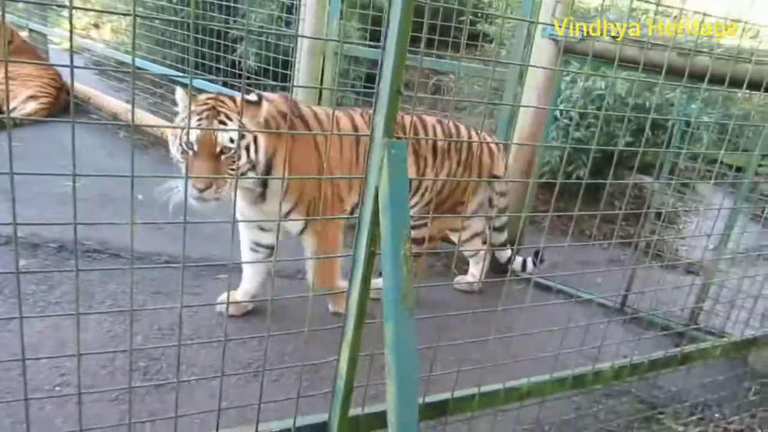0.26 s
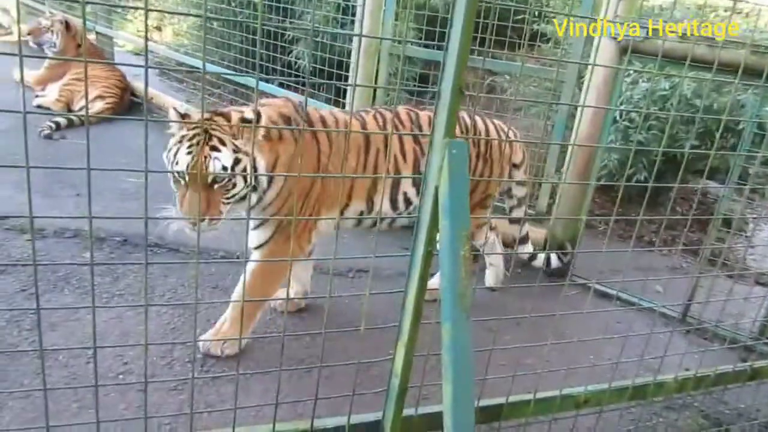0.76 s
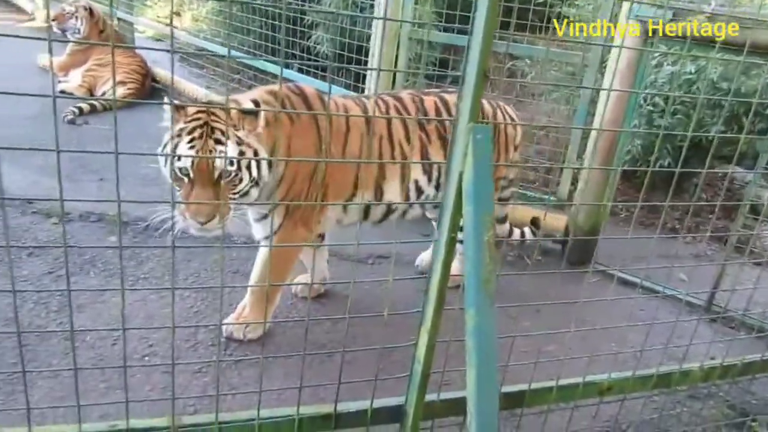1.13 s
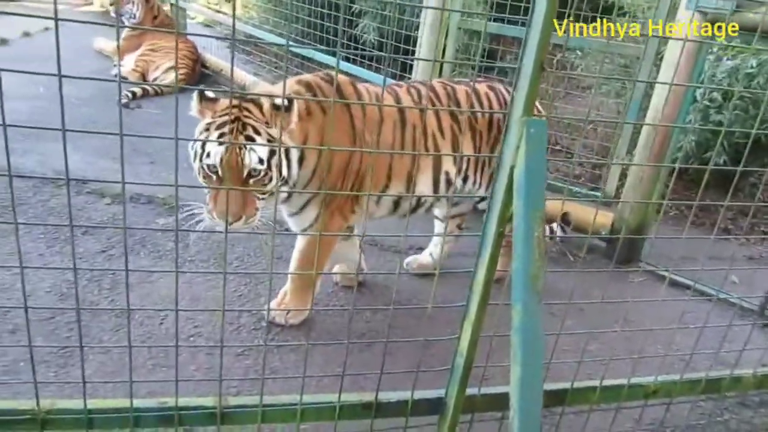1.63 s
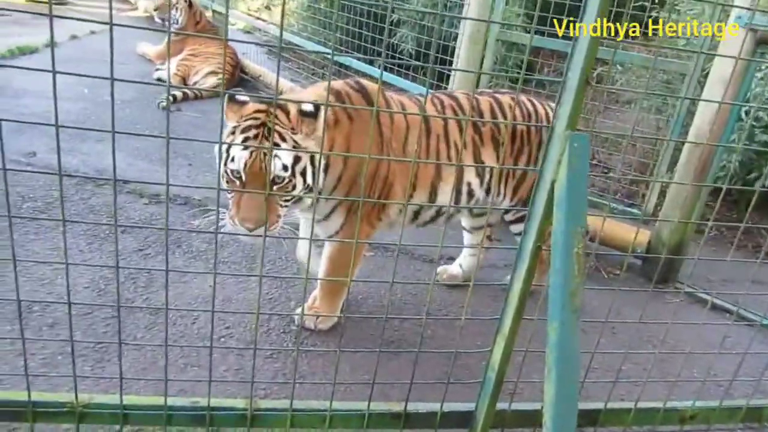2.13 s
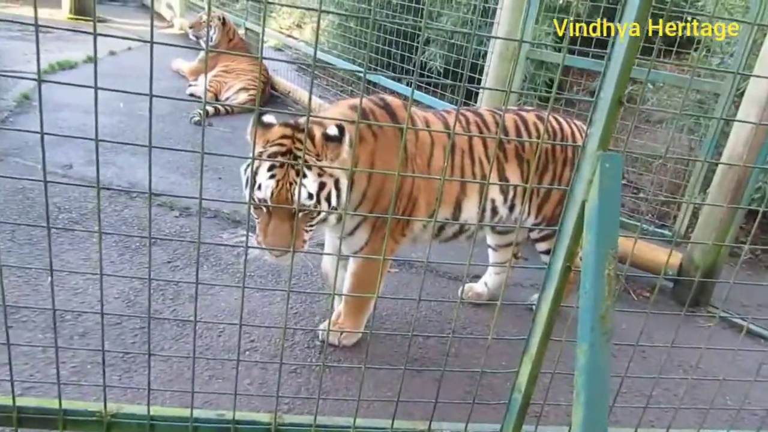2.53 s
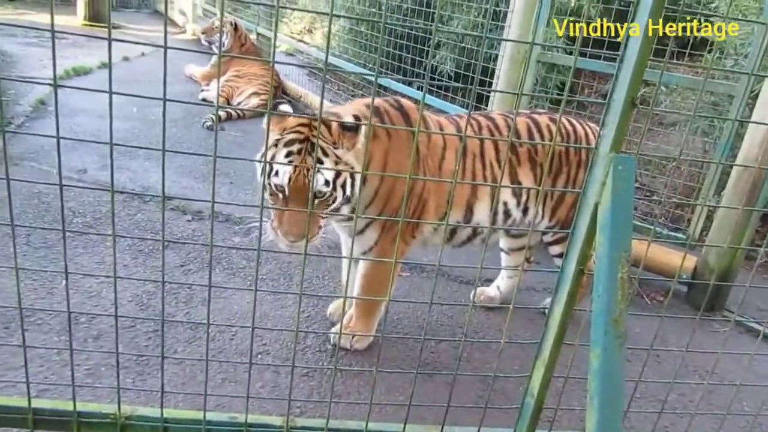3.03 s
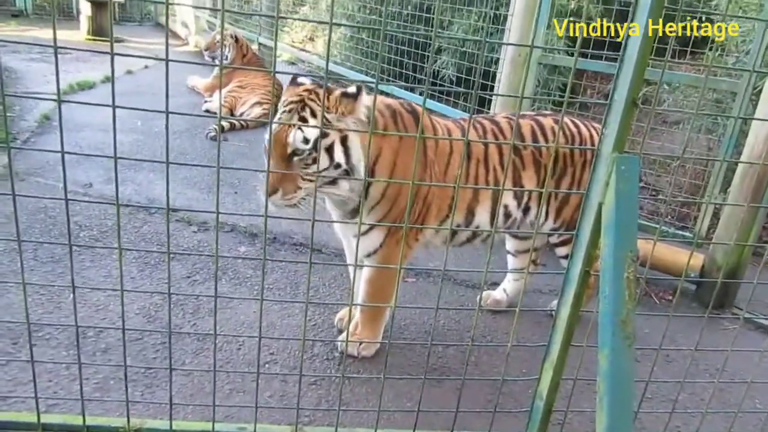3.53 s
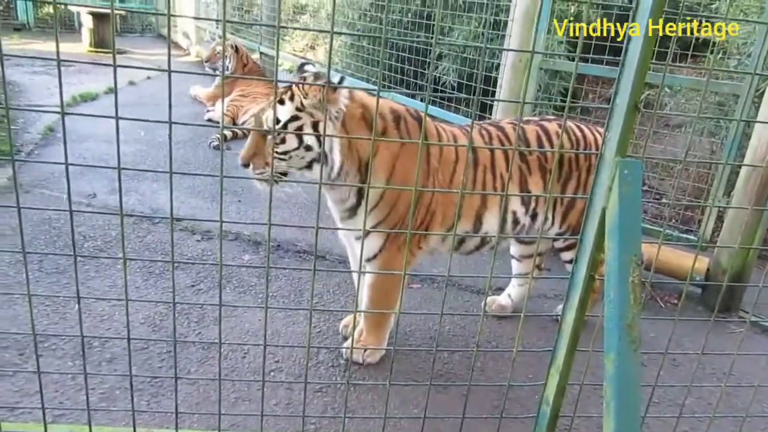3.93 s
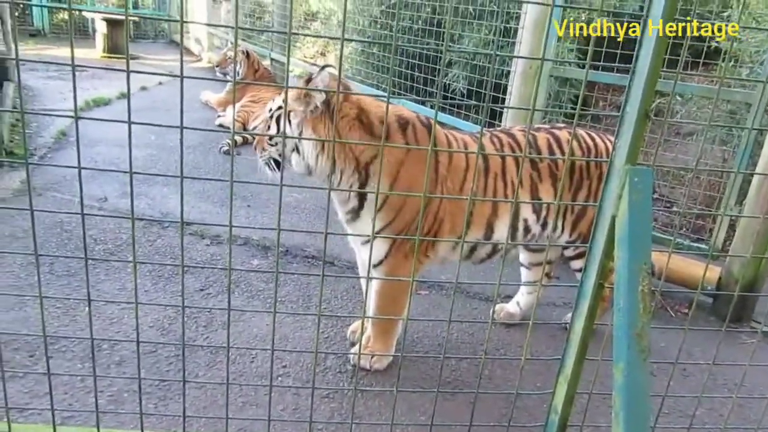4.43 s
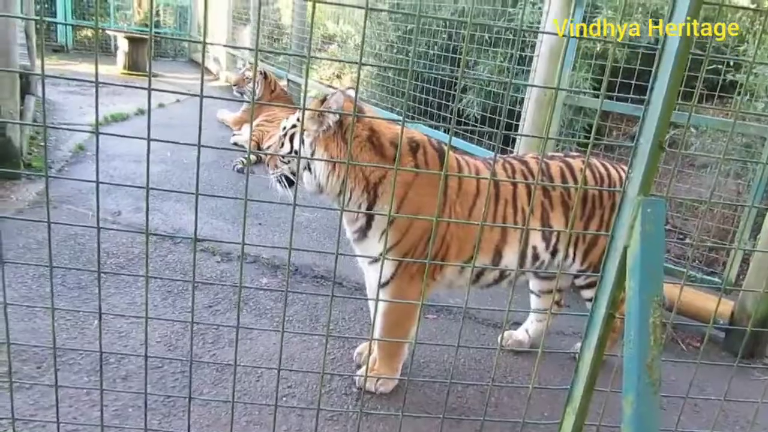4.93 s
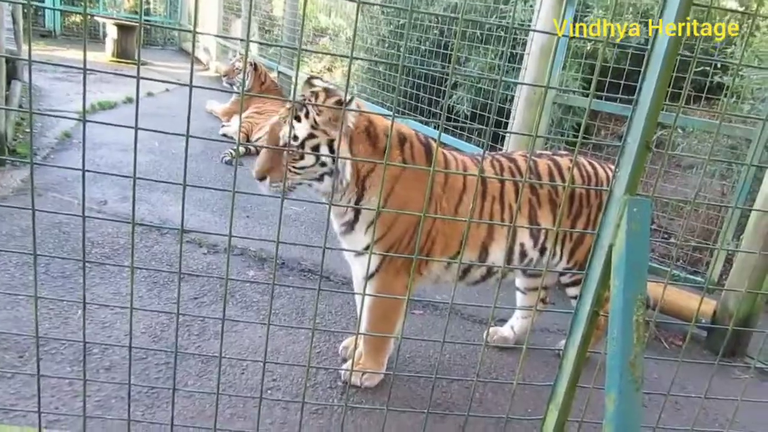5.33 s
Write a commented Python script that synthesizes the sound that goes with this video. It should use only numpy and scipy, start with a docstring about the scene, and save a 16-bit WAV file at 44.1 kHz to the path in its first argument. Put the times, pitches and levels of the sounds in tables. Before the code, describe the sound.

A tiger stands close to the microphone in a paved open-air enclosure. From the start a low closed-mouth rumble, around 150 Hz, leads at 0.12 s into a short harsh roar: a jittery mid-low tone straining upward twice, torn by rasping air and spray, ending near 0.75 s. A small tick follows, and from 0.8 s a longer growl builds, made of slow, irregular flaps about forty a second. It is loudest and brightest around 1.2-1.6 s as the jaw opens, with hard slaps and brief catches, then sinks in pitch and weakens, rattling until 2.4 s. Reverberation is short and faint. Soft outdoor air lifts briefly at 2.5 s, while a high hiss fades after 2.1 s. Thin falling bird whistles come at 2.2-2.7 s, lower chirps at 4.1-4.6 s. Faint distant hums waver from about 3 s, tiny ticks at 3.8 and 4.8 s, soft wind thumps from 4 to 5.4 s.

```python
"""A paved outdoor enclosure: a tiger close by rumbles, bursts into a short harsh roar, then draws out a
rattling growl. The roar is a jittery tone torn by bursts of air; the growl is slow flaps of slack vocal folds
in a moving throat. The enclosure answers briefly. Dry ticks sound, among them clicks of the tiger's mouth and
throat. Below lie air noise that jumps once, a high hiss that fades, gliding bird whistles, faint hums and small
wind thumps. A fast limiter holds the peaks and a low-pass removes the top of the band."""
import sys
import numpy as np
from scipy import signal
from scipy.fft import rfft, irfft, next_fast_len
from scipy.io import wavfile
from scipy.ndimage import uniform_filter1d, minimum_filter1d, map_coordinates

SR = 44100
rng = np.random.default_rng(int(sys.argv[2]) if len(sys.argv) > 2 else 0)


def wav_out(sig):
    """Save sig, one row per channel (or a flat mono array), as 16-bit PCM at SR to the path in sys.argv[1]."""
    wavfile.write(sys.argv[1], SR, np.round(np.clip(np.atleast_2d(sig).T, -1, 1) * 32767).astype(np.int16))


N = 246078

# Outdoor air spectrum. Each row: frequency in Hz, relative density in dB per Hz.
AIR_SPECTRUM = [(20, -14.5), (55, 0), (105, -6.5), (140, -4.5), (170, -9.5), (200, -5.5), (235, -10),
                (280, -10), (345, -13), (550, -13.5), (880, -10), (1700, -18.5), (2400, -24.5),
                (3500, -34.5), (5500, -38), (8000, -40.5), (15000, -51.5)]
# High hiss spectrum. Each row: frequency in Hz, relative density in dB per Hz.
HISS_SPECTRUM = [(2500, -8), (4000, -9.5), (6000, -10), (7600, -8.5), (8600, -9.5), (8800, -43.5),
                 (12000, -90.5)]
AIR_DB, AIR_SWELL_DB, AIR_SWELL_S, AIR_SETTLE_S = -34, 3.5, 2.52, 0.25
HISS_DB, HISS_FADE_S, HISS_FADE_DB_PER_S = -43, 2.1, 13
HISS_DIP_S, HISS_DIP_WIDTH_S, HISS_DIP_DB = .85, 0.1, 1.5

# Decay of the enclosure. Each row: frequency in Hz, T60 in seconds.
ENCLOSURE_T60 = [(150, 0.23), (1000, 0.18), (4000, 0.078), (10000, 0.32)]

# Effort of the growl. Each row: time in seconds, effort in dB.
GROWL_EFFORT = [(.812, -14.5), (.838, -5.5), (1.079, -.3), (1.5, 0), (1.68, -2), (1.86, -6.5), (2.1, -8),
                (2.33, -9), (2.39, -22)]
# Hardest slaps of the folds, before soft limiting. Each row: time in seconds, strength in dB.
FOLD_SLAPS = [(0.837, -22.5), (0.862, -15.5), (0.918, -14), (1.129, -1.5), (1.2, 2.5), (1.295, -12.5),
              (1.322, 4), (1.365, -13), (1.412, -7), (1.441, -11), (1.517, 2.5), (1.55, -2.5), (1.599, -14),
              (1.71, -11), (1.735, -0.5), (1.809, -21), (1.951, -9.5), (1.979, -13), (2.034, -15.5),
              (2.089, -19.5), (2.196, -21), (2.324, -17)]
# Nominal flap rate at 0 dB effort, its slope and its floor; timing scatter in cycles.
FLAP_HZ, FLAP_HZ_PER_DB, SLOWEST_FLAP_HZ, FLAP_SCATTER_CYCLES = 46.58, 3, 36.49, 0.07

# Low body resonances. Each row: centre in Hz, width in Hz, gain in dB.
BELLY_MODES = [(86, 35, -9), (170, 45, 0)]
# Throat resonances. Each row: centre in Hz, width in Hz, gain in dB.
THROAT_MODES = [(236, 37, -8.5), (285, 42, -4), (406, 64, -2)]
# Closed-mouth rumble: four envelope times in seconds; the first and last bound it.
RUMBLE_TIMES_S = (-0.045, 0.2, 0.13, 0.44)
RUMBLE_HZ, RUMBLE_ROUGHNESS = 150.1, 0.5
RUMBLE_DB, RUMBLE_RISE_DB, RUMBLE_FALL_DB, UNDER_ROAR_DB = -15.5, 6, 20.5, -31.5
RUMBLE_THROAT_DB, RUMBLE_NOSE_DB = -12.5, -26.5  # relative to the rumble

# The roar strains twice. Each row: time in seconds, pitch in Hz, roughness (clipped to 0-1).
ROAR_PITCH = [(.11, 360, 1.02), (.18, 459.5, .5), (.245, 350.1, 0.64), (.27, 384.7, 0.94), (.32, 362.4, .5),
              (.375, 334.2, 0.46), (.395, 280.4, 0.25), (.455, 271.9, 0.19), (.495, 345, 0.46),
              (.56, 297.9, .45), (.75, 295, 0.53)]
# Overtones of the roar. Each row: multiple of the pitch, level in dB.
ROAR_OVERTONES = [(2, -26.5), (3, -17), (4, -29.5), (5, -28.5)]
# Torn air in the open mouth. Each row: frequency in Hz, relative density in dB per Hz.
RASP_SPECTRUM = [(440, -40), (750, 4), (1090, -8), (1180, -4), (1410, -8.5), (1550, -8), (2010, -12),
                 (2070, -11.5), (2390, -22.5), (3200, -29.5), (4160, -62.5), (7040, -120)]
# Air over the teeth. Each row: frequency in Hz, relative density in dB per Hz.
SPRAY_SPECTRUM = [(1410, -24), (2400, 2), (2520, -1), (2720, -0.5), (3350, -1), (4210, -4.5), (6120, -15),
                  (8500, -24.5), (11000, -63), (18700, -120)]
# The mouth lets more or less air out. Each row: time in seconds, half-length in seconds, rasp in dB, spray in dB.
AIR_BLASTS = [(0.232, .016, 6, 3), (0.524, 0.034, 4.5, 6.5), (.648, 0.018, -1.5, 5)]
# Roar envelope. In order: start, full level, release and end, all in seconds.
ROAR_TIMES_S = (.12, .185, .59, .755)
ROAR_DB, ROAR_RISE_DB, ROAR_FALL_DB = -3, 15.5, 19.5
# Rasp at 300 Hz and zero roughness; slopes with pitch and roughness; dB per dB of envelope.
RASP_DB, RASP_DB_PER_OCT, RASP_ROUGH_DB, RASP_FOLLOWS = -25, 13.5, 11, 0.67
SPRAY_DB, SPRAY_ROUGH_DB, SPRAY_FOLLOWS = -37, 11.5, 1

# The voice catches; a negative depth lifts it. Each row: time in seconds, depth in dB.
VOICE_CATCHES = [(.57, 7), (.885, -0.5), (.945, 0), (.99, 5.5), (1.186, 4), (1.254, 12.5), (1.374, 12),
                 (1.535, 8.5), (1.608, 3), (1.7, 6), (1.865, 2), (2.235, -1)]
CATCH_WIDTH_S, BRIGHT_CATCH_SHARE = 0.0099, 0.16

# Ticks, which ring where the band is narrow. Each row: time in seconds, peak in dB, low edge in Hz, high edge in Hz.
TICK_BANDS = [(0.775, -21, 1172, 2430), (1.552, -24, 4610, 6900), (2.35, -26, 1285, 1355),
              (3.772, -42, 5440, 8000), (4.783, -43.5, 4000, 14500)]

# Jaw and lips in the growl. Each row: time in seconds, jaw opening 0-1, share of bared teeth 0-1.
JAW_AND_LIPS = [(.82, 0, 0), (1.0, 0.22, 0.15), (1.205, 0.51, 0.09), (1.235, 0.92, 0.77),
                (1.44, 0.88, 0.86), (1.55, 0.6, 0.51), (1.76, 0.64, 0.56), (2.0, 0.38, 0.31),
                (2.38, 0.35, 0.42)]
# Mouth resonances moving with the jaw. Each row: shut centre in Hz, open centre in Hz, width in Hz,
# shut gain in dB, open gain in dB.
MOUTH_MODES = [(727, 927, 60, 22.5, 19), (1025, 1090, 94, 6.5, 24), (1266, 1286, 97, 17.5, 7.5),
               (1370, 1720, 240, -2.5, 17.5)]
# Teeth bared. Each row: centre in Hz, width in Hz, gain in dB.
BARED_TEETH_MODES = [(2100, 130, 10), (2550, 170, 4), (2850, 190, 1.5), (3480, 170, 1.5),
                     (4030, 240, -12.5)]
# Lips lowered. Each row: centre in Hz, width in Hz, gain in dB.
COVERED_TEETH_MODES = [(2130, 93, 9.5), (2790, 190, -1), (3400, 1000, -5), (4080, 760, -27)]
# Narrow gap between lip and teeth. Each row: centre in Hz, width in Hz, gain in dB.
LIP_GAP_MODES = [(3267, 46, 0)]
# Chest at 0 dB effort; dB per dB of effort. It joins weaker and rough, and clears by SAG_START_S.
CHEST_DB, CHEST_FOLLOWS, CHEST_JOIN_LOSS_DB = -14, 1.8, 4
TAUT_ROUGHNESS, SLACK_ROUGHNESS = 0.38, 0.36
# Chest pitch holds, then sinks.
CHEST_TAUT_HZ, CHEST_SLACK_HZ, SAG_START_S, SAG_TIME_CONSTANT_S = 187.7, 109, 1.06, .3
THUMP_HZ, THUMP_WIDTH_HZ, THUMP_SHARE = 120, 42, 0.47  # share of power when slack
THROAT_DB, THROAT_FADE_DB_PER_S = -12, 10  # fades as the lungs empty
MOUTH_DB, TEETH_DB, BARING_DB = -20, -46.5, 23  # at 0 dB effort; extra for fully bared teeth
WHISTLE_S, WHISTLE_WIDTH_S, WHISTLE_DB = 1.91, 0.12, -4.5  # relative to the teeth noise
LEAK, LEAK_PER_DB = 0.73, 0.07  # relative leak between flaps; exponential slope with effort

# Distant birds. Each row: start in seconds, length in seconds, start pitch in Hz, end pitch in Hz, level in dB.
BIRD_CHIRPS = [(2.23, .11, 7300, 6410, -46), (2.405, 0.094, 7450, 7260, -42),
               (2.476, 0.073, 6850, 6300, -52), (2.56, .1, 6340, 5100, -53), (4.06, .1, 3850, 3800, -60),
               (4.12, .17, 4500, 4550, -56.5), (4.18, 0.12, 3400, 3280, -54),
               (4.426, .075, 3860, 3900, -53), (4.47, .11, 2890, 2850, -47), (4.568, .07, 3860, 3800, -55)]
# Far-off hums, full between the times. Each row: start in seconds, end in seconds, pitch in Hz, level in dB.
FAR_HUMS = [(3.57, 3.9, 138, -41), (3.1, 3.95, 280, -45.5), (4.38, 5.35, 180, -42)]
# Wind on the microphone. Each row: time in seconds, envelope peak in dB, pitch in Hz.
WIND_BUFFETS = [(4.021, -27, 92), (4.441, -28, 79), (4.729, -28, 69), (5.22, -27.5, 85), (5.408, -22.5, 68)]

TOP_HZ = 15050


def amp(db):
    """Decibels to gain."""
    return 10 ** (np.asarray(db) / 20)


def unit(x):
    """Scale to rms 1."""
    return x / np.sqrt(np.mean(x ** 2) + 1e-20)


def steady(x, size=3500):
    """Hold the slow level near rms 1 over size samples; keep the fast grain."""
    power = uniform_filter1d(uniform_filter1d(x * x, size), size)
    return x / np.sqrt(np.abs(power) + 1e-6 * np.mean(x * x))


def clock():
    """Time of every sample in seconds."""
    return np.arange(N) / SR


def along(points, hz):
    """Interpolate (Hz, value) points on a log-frequency axis."""
    f, v = np.transpose(points)
    return np.interp(np.log(hz + 1), np.log(f + 1), v)


def curves(rows):
    """One value per sample for each column after the time."""
    s, *cols = np.transpose(rows)
    return [np.interp(clock(), s, c) for c in cols]


def during(start, end, fade=0.015):
    """1 from start to end, with linear fades outside."""
    return np.clip(1 + np.minimum(clock() - start, end - clock()) / fade, 0, 1)


def bump(s, width):
    """Gaussian of height 1 at time s."""
    return np.exp(-((clock() - s) / width) ** 2 / 2)


def swell(times_s, rise_db, fall_db):
    """Envelope in dB relative to full level, interpolated over four times."""
    return np.interp(clock(), times_s, [-rise_db, 0, 0, -fall_db])


def wobble(rate):
    """Smooth random curve, rate knots a second."""
    return map_coordinates(rng.standard_normal(N // 8), [np.arange(N) * rate / SR], mode="mirror")


def filtered(x, response):
    """Apply a complex response of frequency."""
    m = next_fast_len(N + SR // 2)
    return irfft(rfft(x, m) * response(np.fft.rfftfreq(m, 1 / SR)), m)[:N]


def coloured(x, spectrum):
    """Shape x by the spectrum, at rms 1."""
    return unit(filtered(x, lambda hz: amp(along(spectrum, hz))))


def band(x, low_hz, high_hz, order=3):
    """Causal band-pass."""
    edges = [low_hz, min(high_hz, .45 * SR)]
    return signal.sosfilt(signal.butter(order, edges, "band", fs=SR, output="sos"), x)


def resonate(x, modes):
    """Parallel fixed resonances of alternating sign."""
    def response(f):
        return sum((-1) ** k * amp(db) * 1j * f * w / (c * c - f * f + 1j * f * w)
                   for k, (c, w, db) in enumerate(modes))
    return filtered(x, response)


def glide(x, hz, width):
    """One resonance whose centre follows hz, at rms 1: shift to zero, smooth, shift back."""
    turn = np.exp(2j * np.pi * np.cumsum(hz) / SR)
    pole = np.exp(-np.pi * width / SR)
    smooth = signal.lfilter([1 - pole], [1, -pole], x * turn.conj())
    return unit((smooth * turn).real)


def flaps(rate, scatter, size_db):
    """Impulses with random timing (scatter in cycles) and random size."""
    at = np.flatnonzero(np.diff(np.floor(np.cumsum(rate) / SR)))
    late, size = rng.standard_normal((len(at), 2)).T
    at = np.clip(at + scatter * late * SR / rate[at], 0, N - 1).astype(int)
    return np.bincount(at, amp(size_db * size), N)


def puffs(pulses, life_s, leak):
    """Each pulse lets out turbulent air that swells and dies; some leaks between."""
    pole = np.exp(-1 / (life_s * SR))
    flow = signal.lfilter([1], np.poly([pole, pole]), pulses)
    return (unit(flow) + leak) * rng.standard_normal(N)


def outdoors():
    """Open-air noise that jumps and settles once, and high hiss that dips briefly, then sinks away."""
    t = clock()
    settle = np.exp(-np.abs(t - AIR_SWELL_S) / AIR_SETTLE_S)
    swell_db = AIR_SWELL_DB * during(AIR_SWELL_S, t[-1]) * settle
    air = coloured(rng.standard_normal(N), AIR_SPECTRUM) * amp(AIR_DB + swell_db + wobble(5.1))
    fade_db = HISS_FADE_DB_PER_S * np.maximum(t - HISS_FADE_S, 0)
    hiss_db = HISS_DB - fade_db - HISS_DIP_DB * bump(HISS_DIP_S, HISS_DIP_WIDTH_S)
    return air + amp(hiss_db) * coloured(rng.standard_normal(N), HISS_SPECTRUM)


def folds():
    """Slack folds flap faster with effort, with weak rebounds; the flap count is warped to meet the hard slaps."""
    effort_db, = curves(GROWL_EFFORT)
    cycles = np.cumsum(np.maximum(FLAP_HZ + FLAP_HZ_PER_DB * effort_db, SLOWEST_FLAP_HZ)) / SR
    slap_at = [round(s * SR) for s, db in FOLD_SLAPS]
    marks = cycles[[0, *sorted(slap_at), N - 1]]
    whole = np.cumsum(np.maximum(1, np.round(np.diff(marks, prepend=0))))
    rate = SR * np.gradient(np.interp(cycles, marks, whole))
    hard = np.bincount(slap_at, [amp(db) for s, db in FOLD_SLAPS], N) / amp(effort_db - 15.5)
    clear = minimum_filter1d((hard == 0) * 1., size=700)  # no ordinary flap beside a slap
    rebounds = .3 * flaps(rate * 1.4, scatter=.3, size_db=2.5)
    beats = flaps(rate, FLAP_SCATTER_CYCLES, size_db=1.5)
    return clear * (beats + rebounds) + 3.0 * np.tanh(hard / 2.95)


def chest(pulses, pitch, rough):
    """Lowest resonance, near rms 1: a jittery hum, replaced by pulsed throbbing air as roughness rises."""
    rough = np.clip(rough, 0, 1)
    phase = 2 * np.pi * np.cumsum(pitch * np.exp(0.13 * rough * wobble(70))) / SR
    hum = np.sqrt(2) * np.sin(phase)
    air = puffs(pulses, life_s=0.0044, leak=0.68)
    ringing = glide(air, pitch, width=97) + 0.9 * unit(resonate(air, BELLY_MODES))
    throb = steady(band(ringing, 100, 198), size=2000)
    return steady((1 - rough) * hum + 1.7 * rough * throb, size=2000)


def throat(source):
    """Fixed throat resonances, near rms 1."""
    return steady(band(resonate(source, THROAT_MODES), 185, 545), size=2000)


def rumble(pulses):
    """Chest, throat and nose air rumble before and into the roar; later the chest throbs weakly under it."""
    pitch = np.full(N, float(RUMBLE_HZ))
    start_s, end_s = RUMBLE_TIMES_S[0], RUMBLE_TIMES_S[-1]
    lead = amp(RUMBLE_DB + swell(RUMBLE_TIMES_S, RUMBLE_RISE_DB, RUMBLE_FALL_DB)) * during(start_s, end_s)
    under = amp(UNDER_ROAR_DB) * during(end_s, ROAR_TIMES_S[-1] - .03)
    throat_air = throat(puffs(pulses, life_s=0.0014, leak=1.2))
    closed = chest(pulses, pitch, RUMBLE_ROUGHNESS) + amp(RUMBLE_THROAT_DB) * throat_air
    nose = amp(RUMBLE_NOSE_DB) * unit(band(rng.standard_normal(N), 1200, 2300))
    return lead * (closed + nose) + under * chest(pulses, pitch, rough=1.0)


def enclosure(x):
    """Short reverberation of paving, posts and hedges: delayed noise decaying at a rate set by frequency."""
    hz, t, z = signal.stft(rng.standard_normal(SR // 2), SR, nperseg=256)
    decay = amp(-60 * t / along(ENCLOSURE_T60, hz)[:, None])
    tail = signal.istft(z * decay, SR, nperseg=256)[1]
    return signal.fftconvolve(np.pad(x, (300, 0)), tail / np.linalg.norm(tail))[:N]


def catches():
    """Decibels lost where the voice catches."""
    return sum(db * bump(s, CATCH_WIDTH_S) for s, db in VOICE_CATCHES)


def roar():
    """Tight folds sing a jittery tone, torn by bursts of air; pitch and roughness bring more rasp, roughness more spray."""
    pitch, rough = curves(ROAR_PITCH)
    rough = np.clip(rough, 0, 1)
    push_db = swell(ROAR_TIMES_S, ROAR_RISE_DB, ROAR_FALL_DB) - catches()
    rasp_db = RASP_DB + RASP_FOLLOWS * push_db + RASP_DB_PER_OCT * np.log2(pitch / 300) + RASP_ROUGH_DB * rough
    spray_db = SPRAY_DB + SPRAY_FOLLOWS * push_db + SPRAY_ROUGH_DB * rough
    for s, width, more_rasp_db, more_spray_db in AIR_BLASTS:
        rasp_db = rasp_db + more_rasp_db * bump(s, width)
        spray_db = spray_db + more_spray_db * bump(s, width)

    jitter = np.exp(.24 * rough * wobble(200) + 0.1153 * rough * wobble(75))
    phase = 2 * np.pi * np.cumsum(pitch * jitter) / SR
    overtones = sum(amp(db + 2.5 * wobble(50)) * np.sin(round(k) * phase) for k, db in ROAR_OVERTONES)
    tone = np.sin(phase) + overtones

    tears = flaps(np.full(N, 85.), scatter=0.56, size_db=8)
    air = puffs(tears, life_s=0.0025, leak=1.0) * (1 + 0.78 * np.sin(phase))
    ringing = resonate(air, [(250, 160, 4.9), (492, 73, 2.5), (677, 85, 1.8)])  # Hz, width Hz, dB
    torn = steady(band(ringing, 200, 913))
    voice = steady(band(tone * amp(2.9 * rough * wobble(109.2)) + 0.87 * rough * torn, 180, 4400))
    rasp = amp(rasp_db) * steady(coloured(air, RASP_SPECTRUM))
    spray = amp(spray_db) * steady(coloured(puffs(tears, life_s=0.0037, leak=3.3), SPRAY_SPECTRUM))
    return (amp(ROAR_DB + push_db) * voice + rasp + spray) * during(ROAR_TIMES_S[0], ROAR_TIMES_S[-1], fade=0.024)


def ticks(life_s=0.003):
    """Decaying noise clicks, each in its own band."""
    t, out = np.arange(SR // 20) / SR, np.zeros(N)
    for s, db, low_hz, high_hz in TICK_BANDS:
        tick = band(rng.standard_normal(len(t)) * np.exp(-t / life_s), low_hz, high_hz)
        out[round(s * SR):][:len(t)] += amp(db) * tick / np.abs(tick).max()
    return out


def slackening_chest(pulses):
    """The chest joins rough, clears, then sinks in pitch; once slack it also thumps with the flaps."""
    t = clock()
    taut = np.exp(-np.maximum(t - SAG_START_S, 0) / SAG_TIME_CONSTANT_S)
    joining = np.interp(t, [GROWL_EFFORT[0][0], SAG_START_S], [1, 0])
    rough = SLACK_ROUGHNESS + (TAUT_ROUGHNESS - SLACK_ROUGHNESS) * taut + joining
    pitch = CHEST_SLACK_HZ + (CHEST_TAUT_HZ - CHEST_SLACK_HZ) * taut
    hum = amp(-CHEST_JOIN_LOSS_DB * joining) * chest(pulses, pitch, rough)
    thump = steady(band(glide(pulses, np.full(N, float(THUMP_HZ)), THUMP_WIDTH_HZ), 114, 173))
    slack = np.clip(THUMP_SHARE * (1 - taut) ** 9, 0, 1)
    return np.sqrt(1 - slack) * hum + np.sqrt(slack) * thump


def moving_mouth(source, jaw):
    """Jaw opening shifts the centre and gain of each mouth resonance."""
    mouth = np.zeros(N)
    for shut_hz, open_hz, width, shut_db, open_db in MOUTH_MODES:
        gain_db = shut_db + (open_db - shut_db) * jaw + 3.4 * wobble(39.85)
        mouth += amp(gain_db) * glide(source, shut_hz + (open_hz - shut_hz) * jaw, width)
    return steady(band(mouth + 0.14 * unit(band(source, 1300, 2100)), 570, 1850), size=3000)


def teeth_rattle(spit, bared):
    """Air over the teeth crossfades covered and bared resonances; a narrow lip gap whistles once."""
    teeth = bared * unit(resonate(spit, BARED_TEETH_MODES))
    teeth = teeth + (1 - bared) * unit(resonate(spit, COVERED_TEETH_MODES))
    whistle = amp(WHISTLE_DB) * bump(WHISTLE_S, WHISTLE_WIDTH_S) * unit(resonate(spit, LIP_GAP_MODES))
    return steady(band(teeth + whistle, 2390, 4150))


def growl(pulses):
    """Flaps drive chest, throat, moving mouth and teeth; effort sets the levels, bared teeth brighten the rattle."""
    t, (effort_db,), catch_db, start_s = clock(), curves(GROWL_EFFORT), catches(), GROWL_EFFORT[0][0]
    jaw, bared = np.clip(curves(JAW_AND_LIPS), 0, 1)
    leak = LEAK * np.exp(LEAK_PER_DB * effort_db)
    source = puffs(pulses, life_s=0.0018, leak=1.9 * leak)
    spit = puffs(pulses, life_s=0.0018, leak=0.67 * leak) * amp(2.3 * wobble(38.6))

    throat_db = THROAT_DB + effort_db - THROAT_FADE_DB_PER_S * (t - start_s)
    low = amp(CHEST_DB + CHEST_FOLLOWS * effort_db) * slackening_chest(pulses) + amp(throat_db) * throat(source)
    teeth_db = TEETH_DB + 0.7 * effort_db + BARING_DB * bared
    bright = amp(MOUTH_DB + effort_db) * moving_mouth(source, jaw) + amp(teeth_db) * teeth_rattle(spit, bared)
    caught = amp(-catch_db) * low + amp(-BRIGHT_CATCH_SHARE * catch_db) * bright
    return caught * during(start_s, GROWL_EFFORT[-1][0])


def birds():
    """Thin gliding whistles from the trees, with fluttering pitch and level."""
    out, waver = np.zeros(N), 1 + 0.017 * wobble(250)
    for s, length, start_hz, end_hz, db in BIRD_CHIRPS:
        i, n = round(s * SR), round(length * SR)
        pitch = np.linspace(start_hz, end_hz, n) * waver[i:i + n]
        out[i:i + n] += amp(db) * np.hanning(n) * np.sin(2 * np.pi * np.cumsum(pitch) / SR)
    return out * amp(2.8 * wobble(70))


def hums():
    """Faint distant sines, wavering in pitch and level, fade in and out."""
    out = np.zeros(N)
    for start, end, hz, db in FAR_HUMS:
        level = amp(db + 0.78 * wobble(9.8)) * during(start, end, fade=0.32)
        phase = 2 * np.pi * np.cumsum(hz * (1 + 0.012 * wobble(25))) / SR
        out += level * np.sin(phase)
    return out


def buffets(width_s=0.0066):
    """Wind thumps the microphone: short Gaussian bursts of a low sine at random phase."""
    t, out = clock(), np.zeros(N)
    for s, db, hz in WIND_BUFFETS:
        out += amp(db) * bump(s, width_s) * np.sin(2 * np.pi * (hz * (t - s) + rng.random()))
    return out


def scene():
    """The tiger, the enclosure's answer to it, and the dry ticks and outdoor sounds, which the enclosure does
    not answer."""
    pulses = folds()
    tiger = rumble(pulses) + roar() + growl(pulses)
    around = outdoors() + ticks() + birds() + hums() + buffets()
    return (tiger + amp(-15.5) * enclosure(tiger) + around)[None]


def record(dry):
    """A fast limiter with smoothed gain, then a sharp low-pass."""
    ceiling = .93
    needed = np.minimum(1, ceiling / (np.abs(dry[0]) + 1e-9))
    gain = uniform_filter1d(minimum_filter1d(needed, size=90), size=80)
    return filtered(dry[0] * gain, lambda hz: hz < TOP_HZ)[None]


dry = scene()
out = record(dry)
wav_out(out)
```